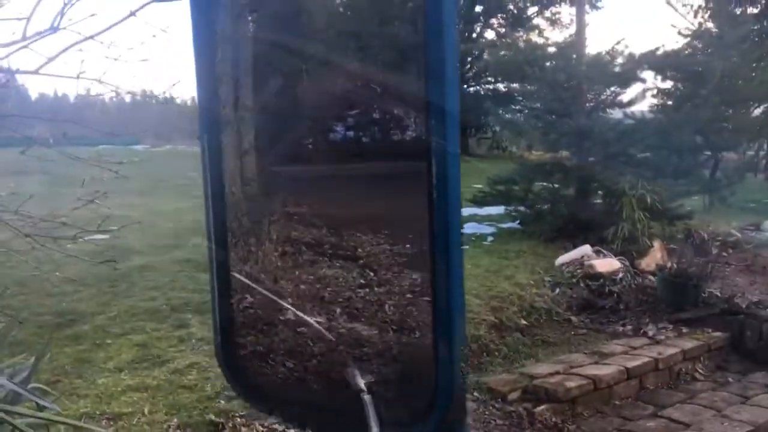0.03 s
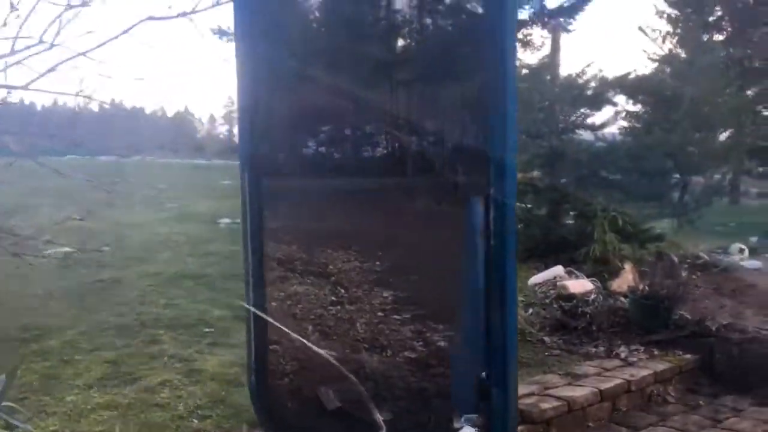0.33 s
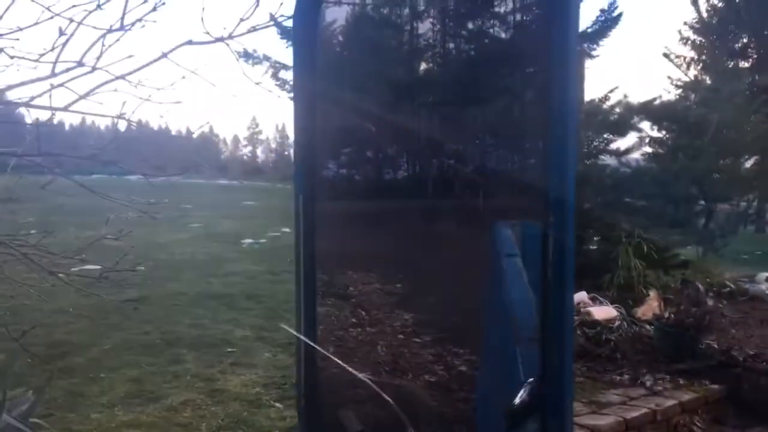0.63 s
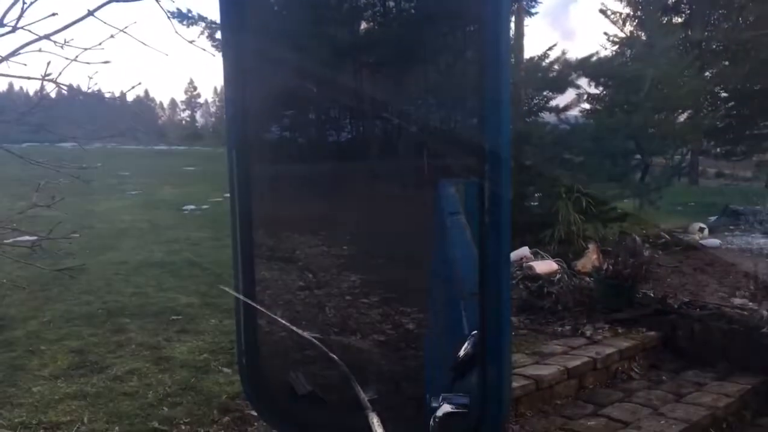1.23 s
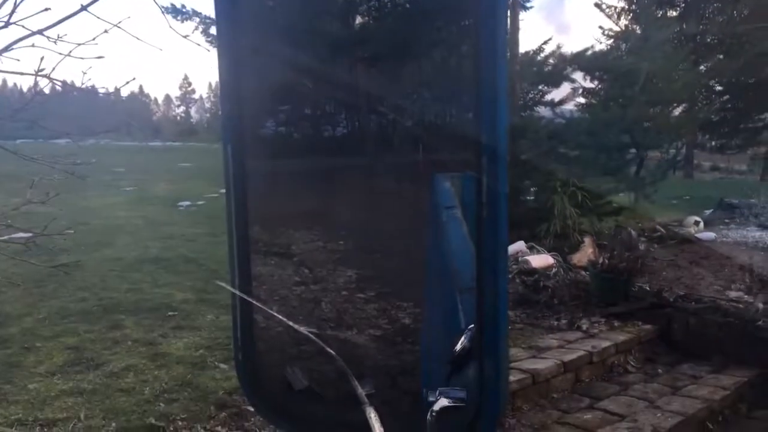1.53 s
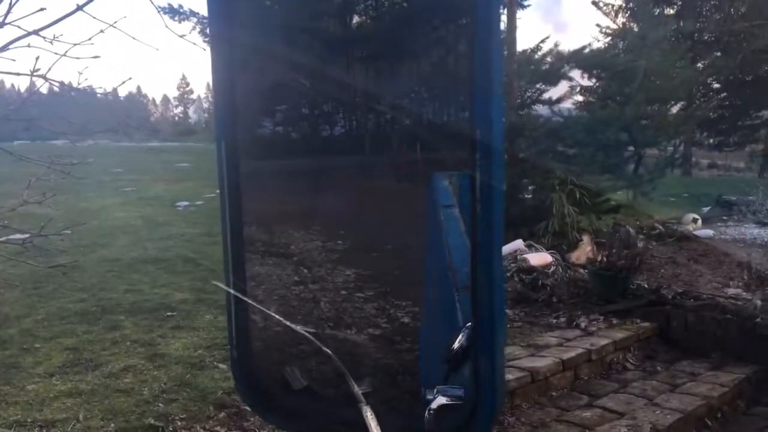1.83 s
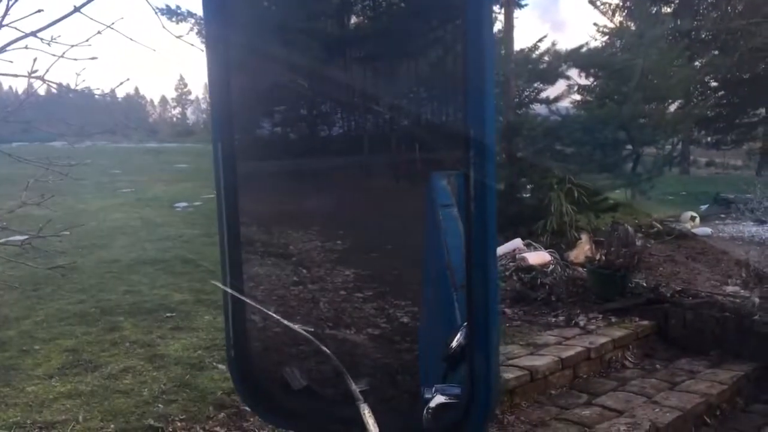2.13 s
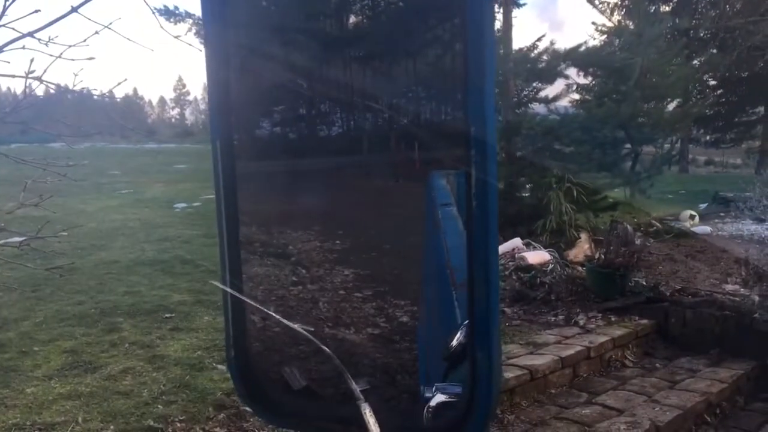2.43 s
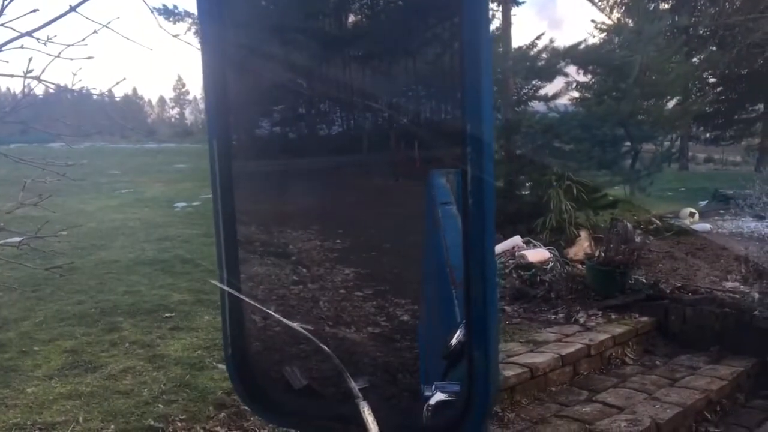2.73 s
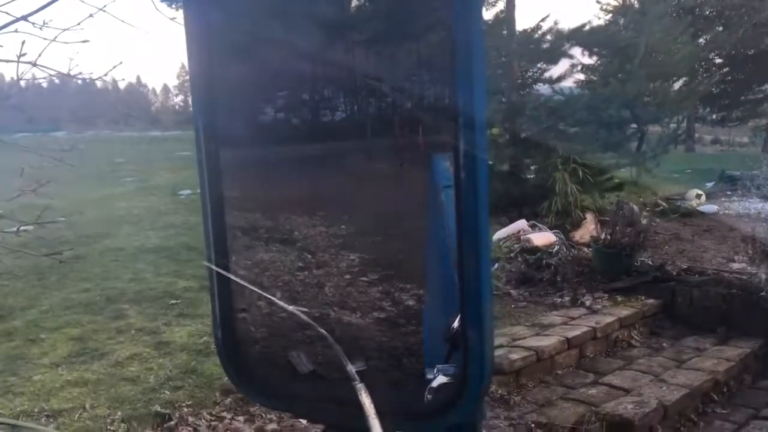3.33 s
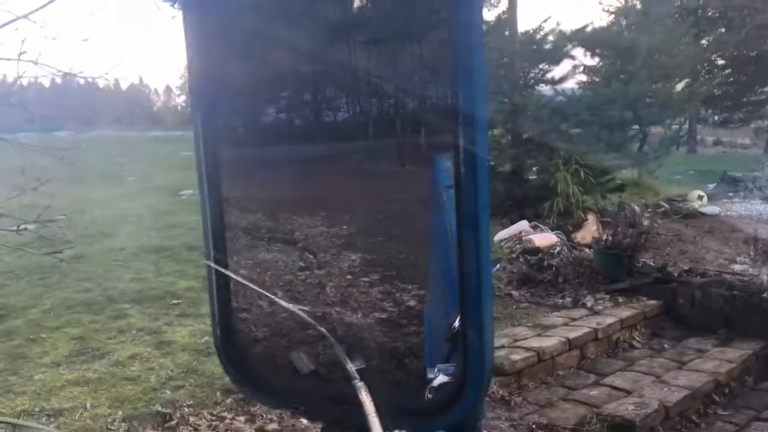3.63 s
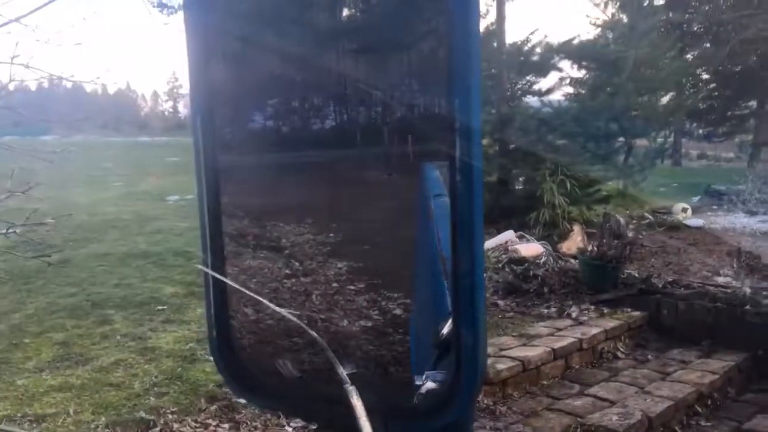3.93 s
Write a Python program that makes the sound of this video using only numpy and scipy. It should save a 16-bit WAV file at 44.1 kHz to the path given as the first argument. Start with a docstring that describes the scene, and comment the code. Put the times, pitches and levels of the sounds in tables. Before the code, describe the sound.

An old vehicle engine idles unevenly with a low rumble and sputtering misfires. It backfires, revs twice with hiss and light rattling, then slows and stalls, heard outdoors from the cab door.

```python
"""A cold old V8, just started, heard outdoors from the cab door. First it stumbles at idle: uneven
firings excite the exhaust pipe's resonances, misfires spit and bang, the body rocks, valves tick, and
fan and intake hiss. Near 1.5 s backfires knock the silencer into ringing. The engine is revved twice,
near 2 s and 2.5 s, and loose parts rattle. Then the speed sinks, a tin shield rings on, the silencer
is knocked again near 3.6 s, and the engine stalls."""
import sys
import numpy as np
from scipy import signal
from scipy.fft import rfft, irfft, next_fast_len
from scipy.io import wavfile
from scipy.ndimage import map_coordinates

SR = 44100
rng = np.random.default_rng(int(sys.argv[2]) if len(sys.argv) > 2 else 0)


def to_wav(sig):
    """Store sig (one row per channel, or 1-D mono) as 16-bit WAV at the path in sys.argv[1].

    Samples outside -1..1 are clipped; the rate is SR.
    """
    pcm = np.clip(np.atleast_2d(sig), -1, 1) * 32767
    pcm = np.round(pcm).astype(np.int16)
    wavfile.write(sys.argv[1], SR, pcm.T)  # frames by channels


N = 176400


def amp(db):
    """Amplitude ratio of a level in decibels."""
    return 10 ** (np.asarray(db) / 20)


def unit(x):
    """Normalisation to rms 1."""
    return x / np.sqrt(np.mean(x ** 2) + 1e-20)


def curve(rows):
    """Linear interpolation of (t/s, value) rows at every sample."""
    return np.interp(np.arange(N) / SR, *np.transpose(rows))


def wobble(knots_per_s):
    """Slow random modulation: a spline through Gaussian values."""
    knots = rng.standard_normal(int(N * knots_per_s / SR) + 4)
    return map_coordinates(knots, [np.arange(N) * knots_per_s / SR])


def burst(start, rise, hold, t60):
    """Transient envelope: linear rise, then exponential decay after the hold; times in seconds."""
    t = np.arange(N) / SR - start
    return np.clip(t / rise, 0, 1) * amp(-60 * np.maximum(t - hold, 0) / t60)


def filtered(x, response):
    """Linear filtering: the spectrum of x times a frequency response."""
    size = next_fast_len(N + SR // 2)
    return irfft(rfft(x, size) * response(np.fft.rfftfreq(size, 1 / SR)), size)[:N]


def coloured(x, spectrum):
    """Spectral shaping by (f/Hz, level/dB) points on a log frequency axis, at rms 1."""
    hz, db = np.transpose(spectrum)
    return unit(filtered(x, lambda f: amp(np.interp(np.log(f + 1), np.log(hz), db))))


def ringing(x, modes, polarity=1):
    """Modal superposition of (f/Hz, bandwidth/Hz, level/dB) rows; polarity -1 alternates their signs."""
    return filtered(x, lambda f: sum(
        polarity ** k * amp(db) * 1j * f * width / (hz * hz - f * f + 1j * f * width)
        for k, (hz, width, db) in enumerate(modes)))


# engine speed: t/s, firing rate/Hz
FIRING_RATE = [(0, 67), (.15, 77.6), (.38, 65), (.55, 68.7), (.72, 77.5), (.9, 84.6), (1.2, 82.5),
               (1.45, 74.6), (1.6, 77), (1.76, 80.5), (1.9, 98), (2.03, 104), (2.26, 96), (2.42, 120.4),
               (2.56, 119), (2.8, 99.7), (3.0, 97.5), (3.2, 83.7), (3.45, 64.6), (3.66, 62), (3.83, 56.4),
               (4, 40)]
def firing_phase():
    """Phase is the integral of frequency: one cycle per firing, at a slightly wavering rate."""
    return np.cumsum(curve(FIRING_RATE) * (1 + .008 * wobble(20))) / SR


# cylinder strengths in firing order: relative level/dB
CYLINDERS = [11.5, 14.5, 7, 14.5, 10.5, 15, 0, 13]
def firings(phase, jitter_cycles=.053, scatter_db=2):
    """Impulse excitation: one pulse per firing, uneven in timing and strength."""
    k = np.arange(int(phase[-1]))
    timing, strength = rng.standard_normal((len(k), 2)).T
    onsets = np.interp(k + jitter_cycles * timing, phase, np.arange(N)).astype(int)
    return unit(np.bincount(onsets, amp(np.resize(CYLINDERS, len(k)) + scatter_db * strength), N))


def puffs(phase, sharpness):
    """Amplitude-modulated noise: it jumps at each firing and decays exponentially."""
    return unit(rng.standard_normal(N) * np.exp(-sharpness * (phase % 1)))


# exhaust pipe modes: f/Hz, bandwidth/Hz, level/dB
PIPE_MODES = [(78.3, 16.4, 1.5), (145.3, 12.7, 4), (197.5, 21, -3.5), (233.8, 28.3, -1.5),
              (287.8, 10.3, 0.5), (306.4, 14.2, 1), (333, 18.5, 0.5), (415, 15.4, -7), (453, 20, -5),
              (557.8, 7.6, -1.5), (630.6, 16, -6), (728.5, 26, -9), (803, 6.1, -16.5), (958, 34, -13.5)]
def pipe(x):
    """Standing waves in the exhaust pipe reinforce x at their frequencies."""
    return ringing(x, PIPE_MODES, polarity=-1)


# rough exhaust: t/s, relative level/dB
EXHAUST_LEVEL = [(0, -35.5), (.35, -36), (.8, -32.5), (1.15, -29.5), (1.32, -24.5), (1.42, -28.5),
                 (1.6, -20), (1.72, -32.5), (1.85, -22), (2.0, -22), (2.12, -27.5), (2.27, -28),
                 (2.45, -17), (2.56, -23.5), (2.75, -22.5), (3.05, -27), (3.35, -34), (3.7, -38.5),
                 (4, -41)]
# spectrum of the escaping gas: f/Hz, relative level/dB
ROAR_SPECTRUM = [(30, -29), (60, 6.5), (120, -1), (300, 1), (500, -2), (720, -7.5), (1000, -14.5),
                 (1500, -21), (2500, -31), (5000, -51)]
def exhaust(phase, pulses, gas_db=4.5, ring_db=-2, roar_db=-4):
    """Source and resonator: pulses and puffs of gas ring the pipe, while some gas roars straight out."""
    flow = pulses + amp(gas_db) * puffs(phase, sharpness=1.37)
    roar = coloured(puffs(phase, sharpness=.88), ROAR_SPECTRUM)
    return amp(curve(EXHAUST_LEVEL)) * (amp(ring_db) * unit(pipe(flow)) + amp(roar_db) * roar)


# firing note, lope and octave, each: t/s, level/dB
NOTE_LEVEL = [(0, -34), (.06, -21.5), (.18, -36), (.33, -28.5), (.6, -30), (.76, -35), (.92, -29),
              (1.05, -24.5), (1.22, -28), (1.38, -53), (1.68, -35.5), (1.78, -26), (1.98, -26.5),
              (2.15, -38), (2.38, -30), (2.62, -41), (2.82, -28), (3.1, -30.5), (3.3, -32), (3.45, -26),
              (3.68, -24.5), (3.74, -31), (3.81, -26), (3.85, -44)]
LOPE_LEVEL = [(0, -41), (1.75, -44), (1.9, -33), (2.05, -35), (2.14, -24), (2.25, -24), (2.34, -34),
              (2.72, -31), (2.86, -25), (3.0, -24.5), (3.12, -26), (3.25, -41), (3.42, -60)]
OCTAVE_LEVEL = [(0, -36.5), (.1, -25.5), (.2, -28), (.4, -44.5), (.53, -27.5), (.68, -27.5), (.82, -36.5),
                (1.36, -37), (1.47, -26.5), (1.68, -39.5), (1.93, -26.5), (2.07, -33), (2.22, -31),
                (2.7, -45), (2.92, -31), (3.12, -33), (3.3, -39), (3.45, -32.5), (3.9, -46)]
# overtones: multiple of the firing rate
OVERTONE_ORDERS = np.array([5, 6, 7, 8, 9, 10, 12]) / 2
# strength of each: relative level/dB
OVERTONE_DB = [-0.5, -2, -11, -4.5, -6.5, -12.5, -8.5]
# all overtones together: t/s, relative level/dB
OVERTONE_LEVEL = [(0, -33.5), (.4, -43), (.7, -34.5), (1.1, -33), (1.35, -44), (1.7, -39), (2, -30),
                  (2.2, -31), (2.5, -29), (2.75, -32), (3, -29.5), (3.3, -37), (3.7, -40), (4, -41)]
def drone(phase, swell_db=3, direct_db=-13):
    """Periodic firing gives a series of partials; overtones swell as they cross the pipe's resonances."""
    def tone(order, level):
        wave = np.sin(2 * np.pi * (order * phase + rng.random()) + .15 * wobble(29.74))
        flutter_db = 1.2 * wobble(30) + wobble(70)
        return wave * amp(curve(level) + flutter_db)

    def overtone(order, db):
        gain = amp(db + swell_db * wobble(13))
        return gain * np.sin(2 * np.pi * (order * phase + rng.random()) + .11 * order * wobble(21.96))

    low = tone(.99, NOTE_LEVEL) + tone(1.5, LOPE_LEVEL) + tone(2, OCTAVE_LEVEL)
    overtones = sum(map(overtone, OVERTONE_ORDERS, OVERTONE_DB)) * amp(curve(OVERTONE_LEVEL) - 2)
    return np.sqrt(2) * (low + pipe(overtones) + amp(direct_db) * overtones)


# shaking of the body: t/s, level/dB
SHUDDER_LEVEL = [(0, -26.5), (.3, -29), (.52, -20), (.75, -26), (1.3, -25), (1.42, -36), (1.55, -23),
                 (1.7, -25), (1.88, -18.5), (2.15, -30), (2.45, -20), (2.85, -32), (3.0, -46), (3.4, -34),
                 (3.75, -31), (4, -35)]
# its response: f/Hz, relative level/dB
SHUDDER_RESPONSE = [(5, 11), (18, -4.5), (32, 3), (42, -9), (55, -0.5), (80, -4), (160, -45)]
def shudder(phase, rocking_db=-3):
    """Forced vibration: unequal cylinders rock the body at subharmonics of the firing rate."""
    cycle = phase / len(CYLINDERS)
    rocking = unit(sum(np.sin(2 * np.pi * (k * cycle + rng.random()) + .5 * wobble(23))
                       for k in (2, 3, 4)))
    rumble = coloured(rng.standard_normal(N), SHUDDER_RESPONSE)
    return amp(curve(SHUDDER_LEVEL)) * coloured(rumble + amp(rocking_db) * rocking, SHUDDER_RESPONSE)


# rush of air: t/s, relative level/dB
AIR_LEVEL = [(0, -45), (.35, -49.5), (.6, -46), (1.1, -45), (1.25, -39.5), (1.4, -45.5), (1.68, -45),
             (1.95, -32), (2.05, -39.5), (2.27, -37), (2.45, -38), (2.6, -34), (2.9, -37.5), (3.3, -44.5),
             (3.55, -47.5), (3.75, -50.5), (4, -56.5)]
# its spectrum: f/Hz, relative level/dB
HISS_SPECTRUM = [(300, -59), (900, 14.5), (1600, -3), (2000, -1), (2900, -5), (3500, -6.5), (4100, -10.5),
                 (4700, -11), (6500, -9), (8700, -13.5), (10500, -22), (15500, -33)]
def hiss(phase):
    """Flow noise of fan and intake, lightly modulated by the firings."""
    gain = amp(curve(AIR_LEVEL) + .52 * wobble(30.21))
    return gain * coloured(puffs(phase, sharpness=.072), HISS_SPECTRUM)


# valve ticks: f/Hz, relative level/dB
TICK_SPECTRUM = [(400, -17), (1000, 13.5), (1600, 11), (2100, -0.5), (3000, 5.5), (3500, -4), (4100, -11),
                 (5000, -5.5), (7000, -6.5), (8500, -2.5), (11000, -11.5), (15500, -14)]
def clatter(phase, level_db=-15, uneven_db=4):
    """Impact noise: valves and fittings tick about once per firing, swelling with the rush of air."""
    k = np.arange(int(phase[-1]))
    timing, strength = rng.standard_normal((len(k), 2)).T
    onsets = np.interp(k + .5 * timing, phase, np.arange(N)).astype(int)
    ticks = np.bincount(onsets, amp(uneven_db * np.minimum(strength, 2)), N)
    envelope = signal.fftconvolve(ticks, burst(0, rise=.00075, hold=0, t60=.045))[:N]
    return amp(level_db + curve(AIR_LEVEL)) * coloured(envelope * rng.standard_normal(N), TICK_SPECTRUM)


# sheet metal modes of the body: f/Hz, bandwidth/Hz, relative level/dB
PANEL_MODES = [(1058, 10, 6.5), (1270, 32, -1), (1530, 34, -6.5), (1688, 14, 7), (5840, 180, -6),
               (8700, 170, -13)]
def body(x, echo_t60_s=.055, echo_db=-10, echo_above_hz=900, panel_db=-3):
    """Interference with door and ground reflections combs the treble; the panels ring in sympathy."""
    t = np.arange(SR // 4) / SR
    tail = rng.standard_normal(len(t)) * amp(-60 * t / echo_t60_s)
    echo = signal.fftconvolve(x, tail / np.linalg.norm(tail))[:N]
    x = x + filtered(echo, lambda f: amp(echo_db) * f ** 2 / (f ** 2 + echo_above_hz ** 2))
    return x + amp(panel_db) * ringing(x, PANEL_MODES)


# tin shield modes: f/Hz, bandwidth/Hz, relative level/dB
SHIELD_MODES = [(2552, 50, -4), (2842, 50, -5), (4130, 160, 0), (5340, 80, -9)]
# its ring: t/s, level/dB
SHIELD_LEVEL = [(0, -66), (1.2, -63), (2.8, -57), (3.05, -57), (3.3, -66), (3.7, -73), (4, -70)]
def shield():
    """Random excitation: the engine keeps a tin shield ringing, most as it begins to wind down."""
    return amp(curve(SHIELD_LEVEL)) * unit(ringing(rng.standard_normal(N), SHIELD_MODES))


# background hiss: f/Hz, relative level/dB
BACKGROUND_SPECTRUM = [(500, 5), (2500, -1), (6000, -1), (10000, 1), (15500, -8)]
def background(level_db=-65):
    """Stationary noise: a faint, even hiss under everything."""
    return amp(level_db) * coloured(rng.standard_normal(N), BACKGROUND_SPECTRUM)


# silencer can modes: f/Hz, bandwidth/Hz, relative level/dB
SILENCER_MODES = [(612, 45, -0.5), (735, 24, 1), (840, 42, -5), (962, 16, -2), (1142, 15, -10.5),
                  (1670, 110, -16), (2120, 280, -21.5), (2520, 39, -20.5)]
# backfire blows: t/s, relative level/dB, centre f/Hz
KNOCKS = [(1.44, -18.5, 960), (1.537, -26.5, 1970), (1.554, -14.5, 790), (1.577, -21.5, 650),
          (3.574, -29, 1011), (3.597, -30, 1050), (3.762, -37.5, 1302)]
def silencer(pulses, buzz_db=-50, bark_db=-3.5, blow_width_hz=600):
    """Resonance of the can: firings keep its lowest mode buzzing; backfires knock it into a hard bark."""
    bark = np.zeros(N)
    for start, db, hz in KNOCKS:
        blow = ringing(rng.standard_normal(N), [(hz, blow_width_hz, 0)])
        can = unit(ringing(blow, SILENCER_MODES, polarity=-1))
        bark += amp(db) * burst(start, rise=.0015, hold=.0044, t60=.16) * can
    buzz = unit(ringing(pulses + rng.standard_normal(N), SILENCER_MODES[:1]))
    return amp(buzz_db) * buzz + amp(bark_db) * bark


# misfires: t/s, relative spit level/dB, relative bang level/dB
MISFIRES = [(0.061, -46, -32), (.146, -51.5, -37.5), (.403, -52, -45), (.492, -54.5, -37), (.578, -53, -38),
            (.667, -56, -42), (.81, -55, -39), (1.247, -49, -26.5), (1.313, -59, -40), (1.439, -44, -20),
            (1.527, -35.5, -14.5), (1.812, -38, -28), (1.877, -34.5, -21.5), (1.938, -35, -22),
            (1.995, -47, -45), (2.294, -36.5, -21.5), (2.353, -33.5, -20.5), (2.406, -36, -19.5),
            (2.457, -39.5, -23), (2.607, -60, -27), (2.777, -49, -38), (2.84, -54, -33), (2.955, -56, -47),
            (3.023, -50, -36), (3.569, -42, -21), (3.758, -53.5, -41.5)]
# spectra of spit and bang, each: f/Hz, relative level/dB
SPIT_SPECTRUM = [(300, -28), (1200, 1.5), (2200, -6.5), (3200, -3.5), (4300, 3), (5200, -1), (7000, 1),
                 (9500, -4.5), (12000, -10.5), (15500, -16)]
BANG_SPECTRUM = [(30, 14), (100, -0.5), (250, 4.5), (400, -1), (600, 5), (950, -5.5), (1300, -10.5),
                 (1750, -14), (2300, -16.5), (3000, -18.5), (6000, -34.5), (15000, -83)]
def misfires(crackle_db=-.9, direct_db=-1.5, ring_db=-4):
    """Combustion transients: unburnt fuel goes off with a crackling spit and a bang that rings the pipe."""
    spit = sum(amp(db) * burst(start, rise=.004, hold=.016, t60=.145) for start, db, _ in MISFIRES)
    bang = sum(amp(db) * burst(start, rise=.0088, hold=.035, t60=.21) for start, _, db in MISFIRES)
    crackle = amp(crackle_db * wobble(500))
    spit *= coloured(crackle * rng.standard_normal(N), SPIT_SPECTRUM)
    bang *= coloured(crackle * rng.standard_normal(N), BANG_SPECTRUM)
    return spit + amp(direct_db) * bang + amp(ring_db) * pipe(bang)


# hard firings that set the pipe booming: t/s, f/Hz, level/dB
BOOMS = [(.735, 537, -37), (1.26, 192.1, -21.5), (1.53, 240, -19), (1.55, 604, -24), (1.945, 334.3, -20.5),
         (2.015, 309.9, -22.5), (2.3, 331.5, -24.5), (2.375, 233.4, -28), (2.41, 573, -31),
         (2.452, 330.9, -19), (2.705, 603.3, -27.5), (2.715, 444.3, -26.5), (3.575, 297, -28.5),
         (3.58, 437.6, -38.5), (3.585, 735, -34.5), (3.77, 627, -38), (3.8, 145.1, -36)]
def booms():
    """Damped free oscillation: one pipe resonance hums on briefly after each of the hardest firings."""
    t = np.arange(N) / SR
    hum = np.zeros(N)
    for start, hz, db in BOOMS:
        wave = np.sin(2 * np.pi * hz * (t - start) + .12 * wobble(60))
        hum += amp(db) * burst(start, rise=.011, hold=.017, t60=.22) * wave
    return np.sqrt(2) * hum


# loose parts: t/s, f/Hz, T60/s, level/dB
RATTLES = [(2.116, 6566, 0.0084, -35), (2.413, 4390, 0.14, -35.5), (2.986, 1041, 0.11, -42)]
def rattles():
    """Damping sets bandwidth: loose parts tick and clank, and the shorter the ring, the wider its band."""
    clanks = np.zeros(N)
    for start, hz, t60, db in RATTLES:
        ring = unit(ringing(rng.standard_normal(N), [(hz, 12 / t60, 0)]))
        clanks += amp(db) * burst(start, rise=.0016, hold=0, t60=t60) * ring
    return clanks


def scene():
    """Superposition in one channel: the running engine's sounds share one firing phase."""
    phase = firing_phase()
    pulses = firings(phase)
    noises = amp(-.5) * exhaust(phase, pulses) + amp(-4) * hiss(phase)
    noises += amp(-.75) * misfires() + rattles() + clatter(phase)
    tones = drone(phase) + booms() + silencer(pulses) + shield()
    return (tones + background() + shudder(phase) + body(noises))[None]


def record(dry, low_hz=12, top_hz=15750):
    """Band limiting: a gentle high-pass and a steep low-pass."""
    dry = signal.sosfilt(signal.butter(2, low_hz, "high", fs=SR, output="sos"), dry)
    return signal.sosfilt(signal.ellip(12, .1, 90, top_hz, fs=SR, output="sos"), dry)


dry = scene()
out = record(dry)
to_wav(out)
```